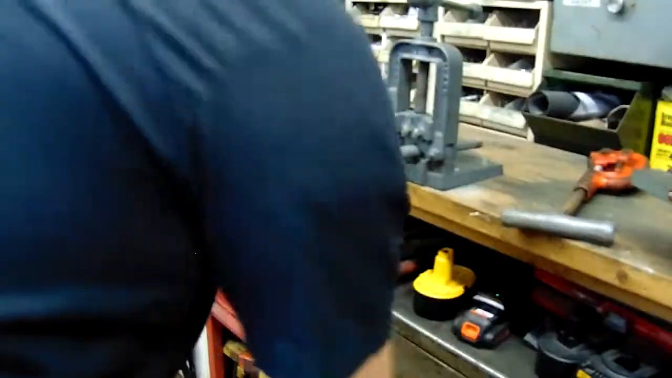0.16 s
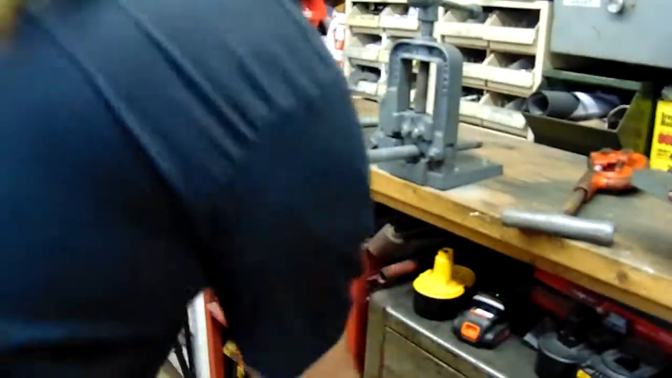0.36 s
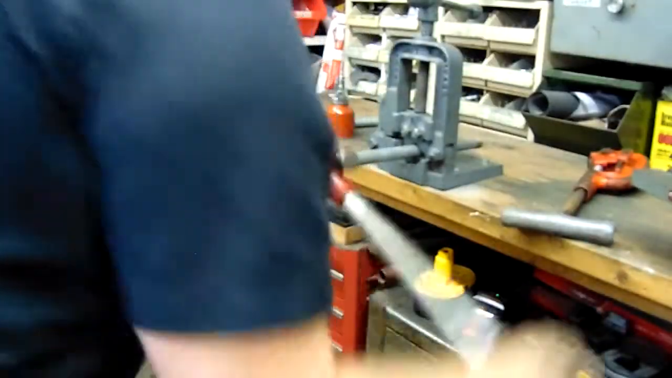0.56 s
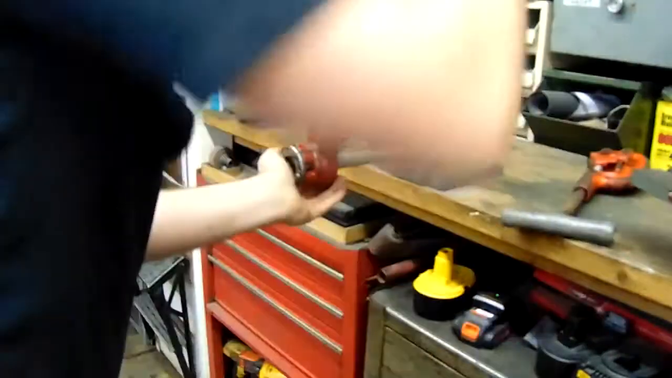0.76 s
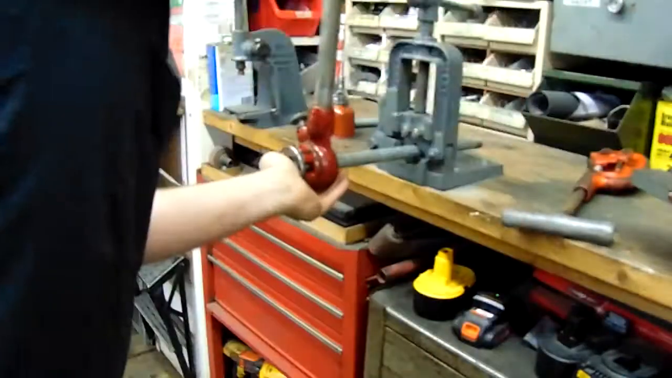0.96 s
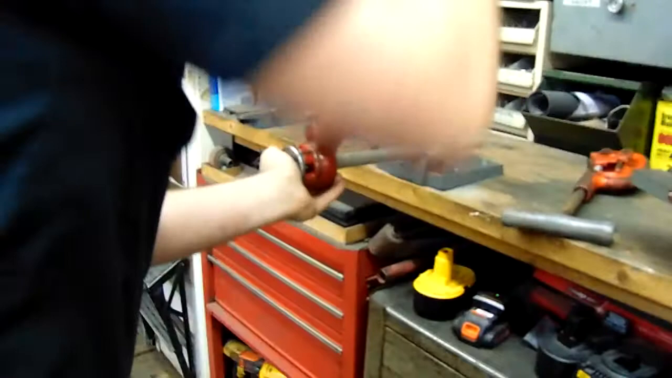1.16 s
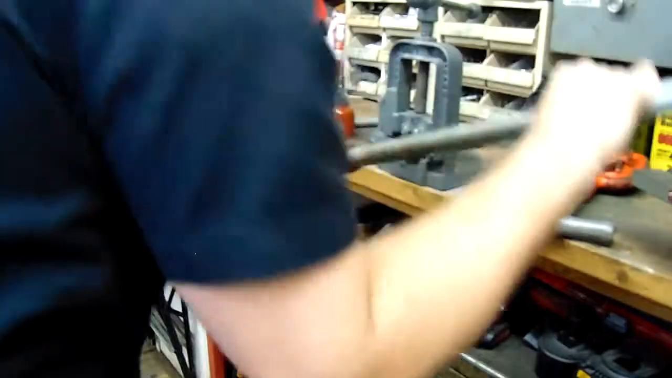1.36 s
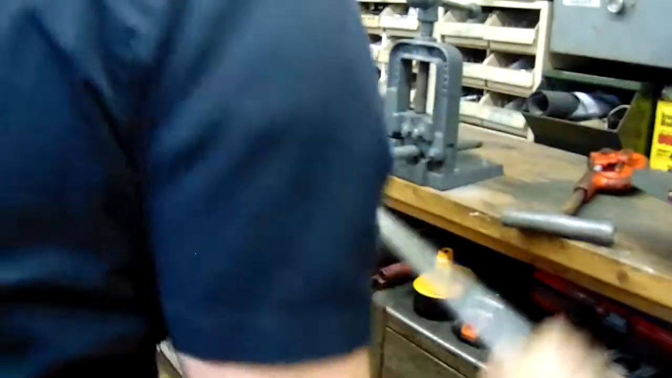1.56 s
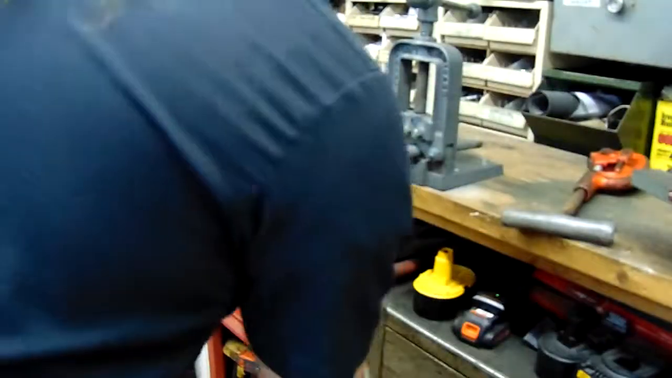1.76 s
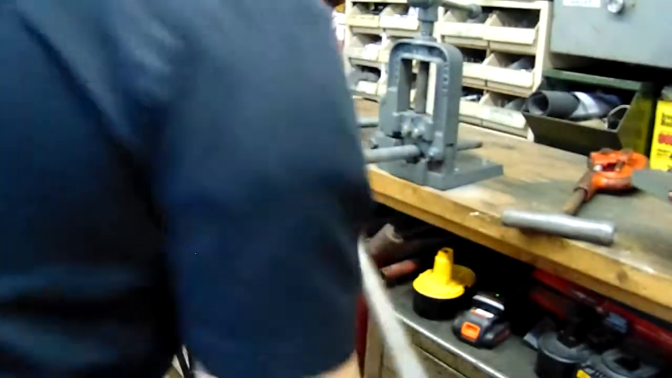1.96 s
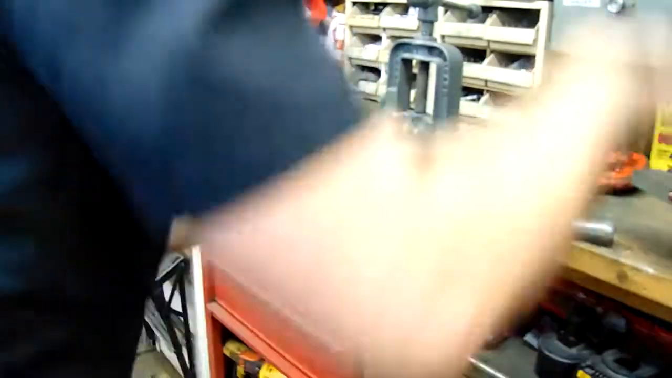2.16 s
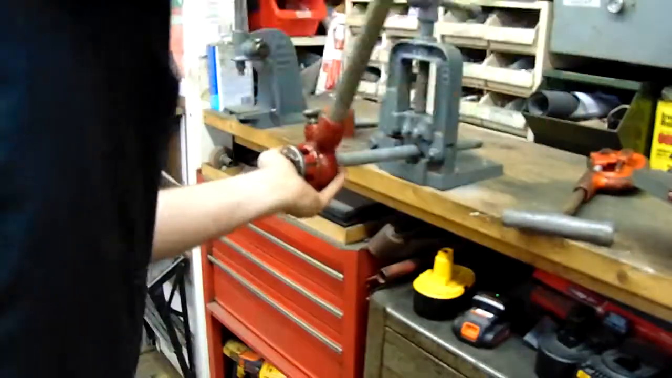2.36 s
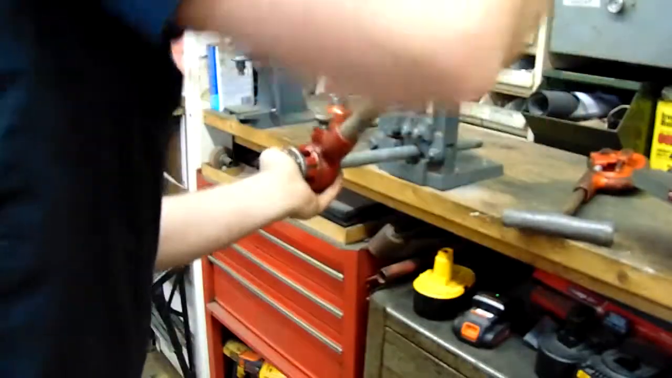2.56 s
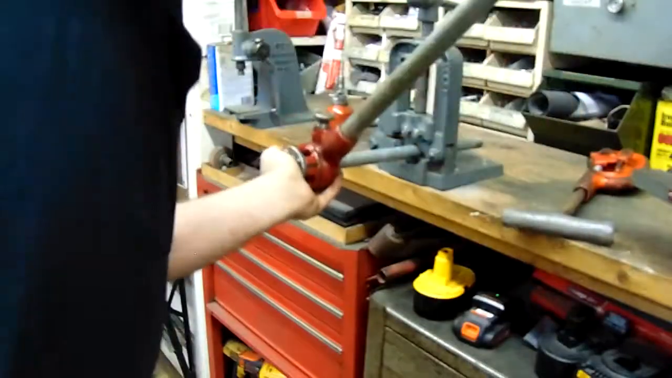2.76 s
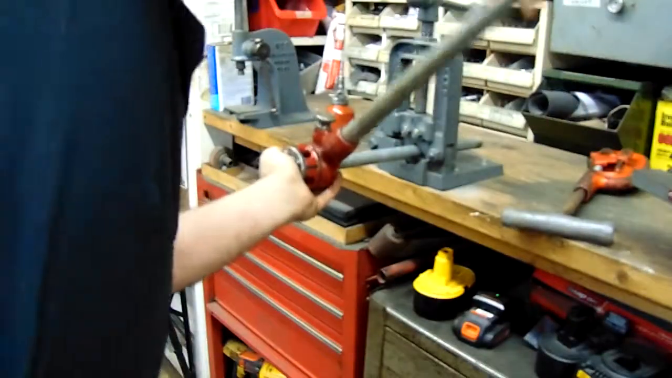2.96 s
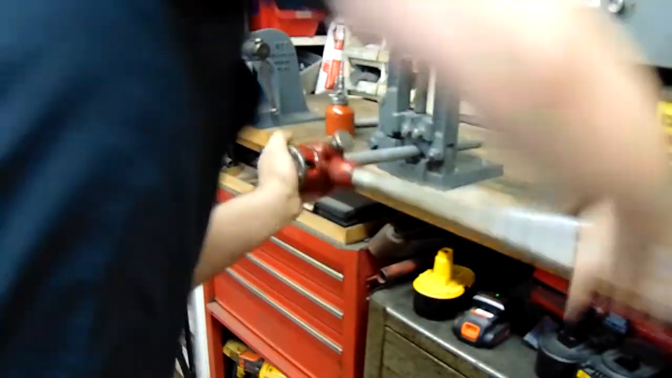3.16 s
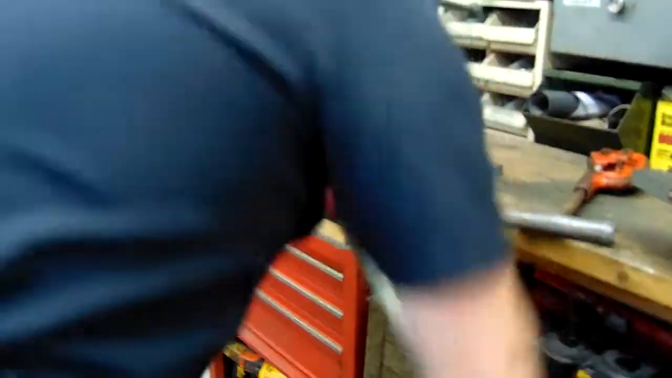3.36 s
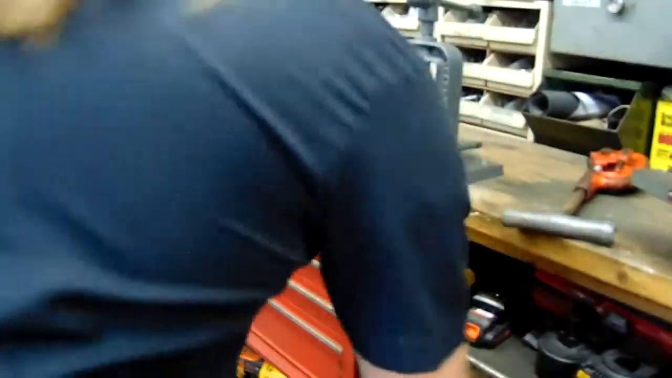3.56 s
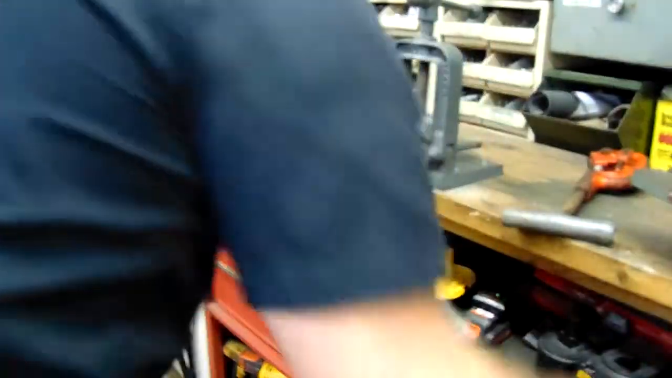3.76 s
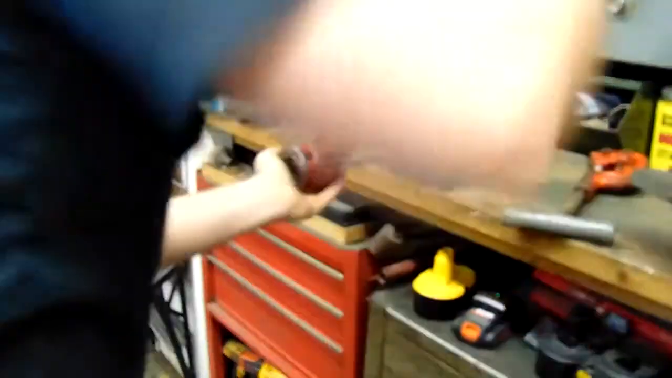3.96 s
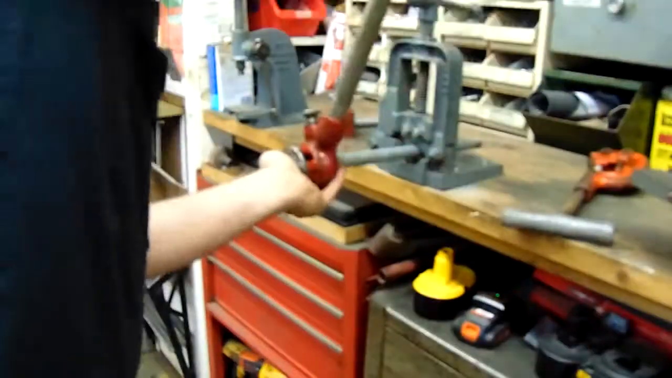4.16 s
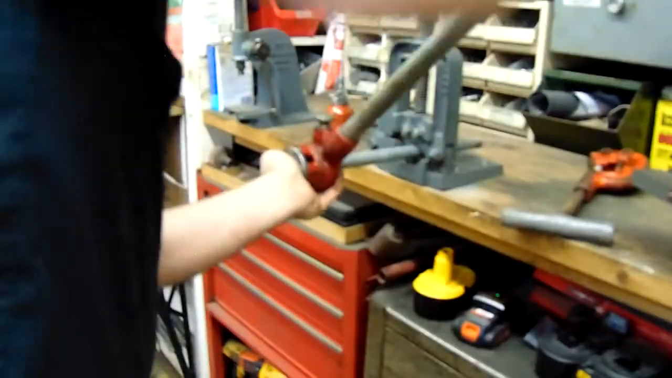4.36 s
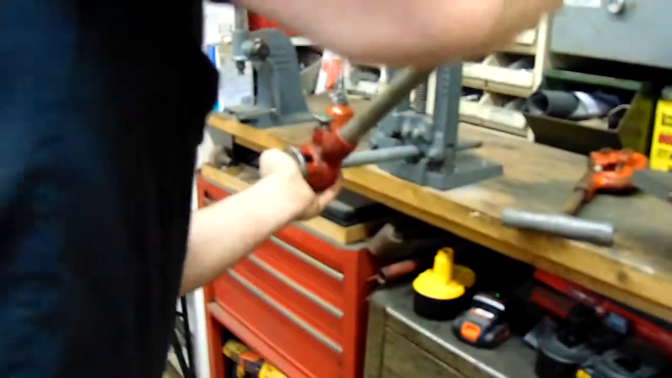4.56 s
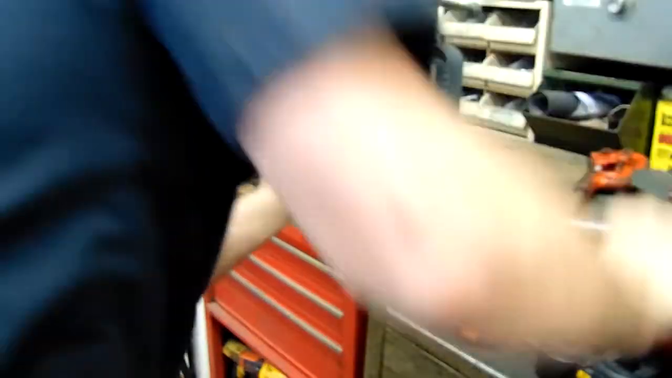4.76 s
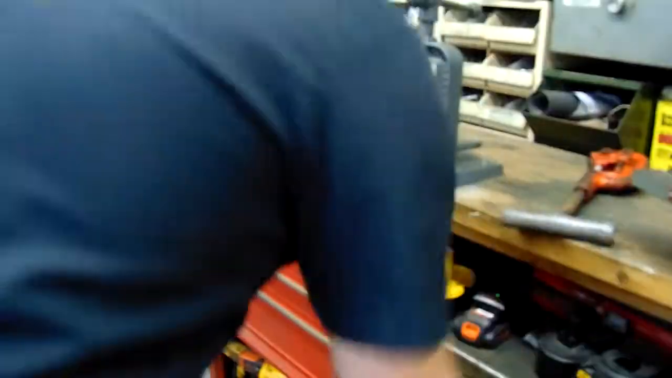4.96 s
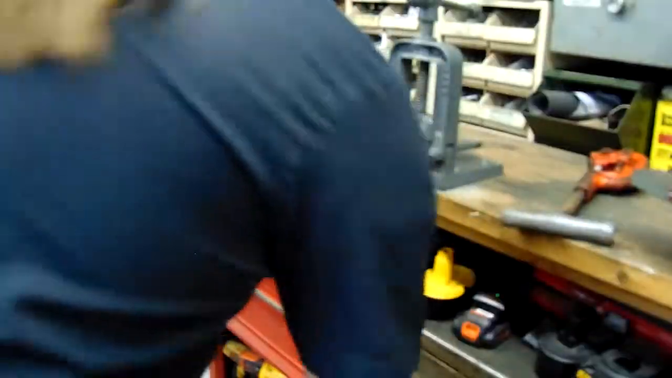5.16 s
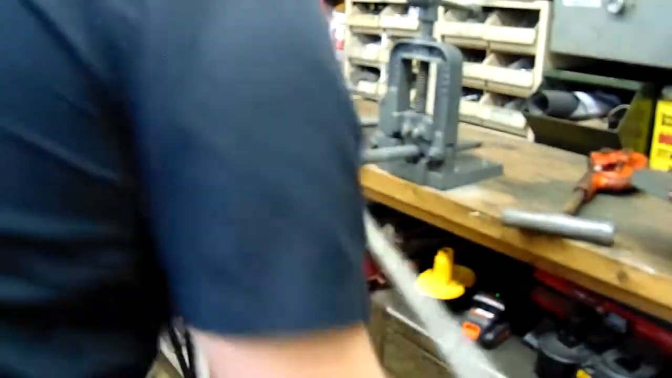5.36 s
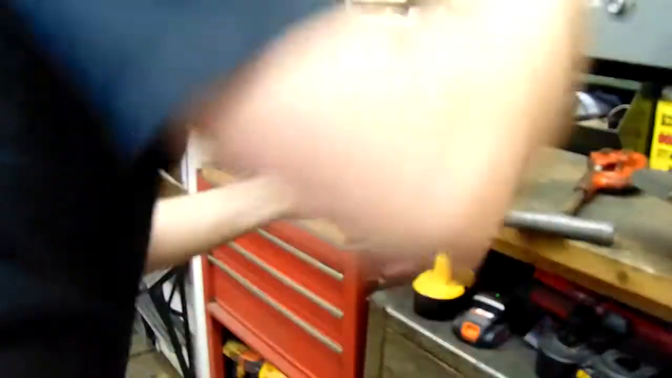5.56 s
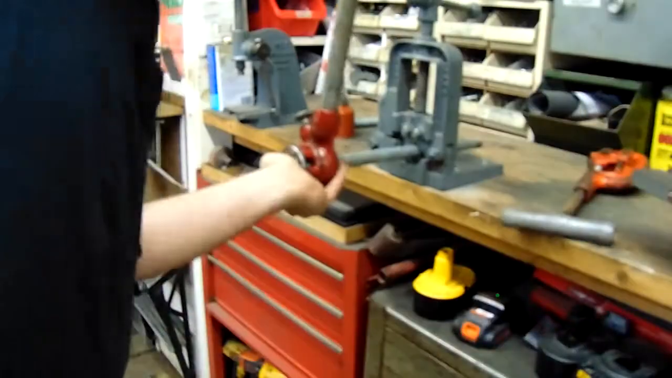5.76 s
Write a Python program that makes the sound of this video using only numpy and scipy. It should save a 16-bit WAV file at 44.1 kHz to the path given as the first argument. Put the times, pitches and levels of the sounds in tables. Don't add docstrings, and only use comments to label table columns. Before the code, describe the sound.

A ratcheting hand pipe threader clacks in short runs of bright metallic snaps, with dull bench knocks and faint steel scraping between strokes.

```python
import sys
import numpy as np
from scipy import signal
from scipy.fft import rfft, irfft
from scipy.io import wavfile
from scipy.ndimage import uniform_filter1d

SR = 44100
rng = np.random.default_rng(int(sys.argv[2]) if len(sys.argv) > 2 else 0)


def to_wav(s):
    ch = np.atleast_2d(s).T
    pcm = np.round(np.clip(ch, -1, 1) * 32767)
    wavfile.write(sys.argv[1], SR, pcm.astype(np.int16))


def gain_from_db(level_db):
    decades = np.asarray(level_db, float) / 20
    return 10 ** decades


N = 256220

# [f/Hz, level/dB, t60/s]
BENCH_MODES = [(259, 5, 0.21), (251.8, 14, 0.16), (294, -16, 0.052), (336.5, 1, 0.32), (470, 21.5, 0.11),
               (522, 20.5, 0.028), (649, 4.5, 0.23), (765.6, -2, 0.23), (849, -3.5, 0.18), (1053, 3.5, 0.1),
               (1390, -66, 0.058), (1990, -2, 0.093), (2373, 6, 0.023), (3590, -32, 0.15),
               (4460, -24, 0.12), (5030, -38, 0.18), (6800, -57, 0.45)]
# [f/Hz, density/dB per Hz]
THUD_SPECTRUM = [(88, -22), (150, -14), (304, 9), (376, 2), (501, -2), (561, 2.5), (748, -6), (6250, -43.5),
                 (6750, -39.5), (14500, -49.5)]
BENCH_SPREAD = 0.012


def colour(x, points):
    hz, db = np.transpose(points)
    grid_hz = np.maximum(np.fft.rfftfreq(4096, 1 / SR), 1)
    cepstrum = irfft(np.interp(np.log(grid_hz), np.log(hz), db) * np.log(10) / 20)
    cepstrum[1:2048] *= 2
    cepstrum[2049:] = 0
    impulse = irfft(np.exp(rfft(cepstrum)))[:2048]
    return signal.fftconvolve(x, impulse)[:len(x)]


def unit(x):
    return x / np.sqrt(np.mean(x ** 2))


def walk(rate_hz):
    k = int(SR / rate_hz)
    steps = np.repeat(rng.standard_normal(N // k + 1), k)
    return uniform_filter1d(uniform_filter1d(steps, k), k)[:N]


def fade(t, t60):
    return np.exp(-np.log(1000) * t / np.maximum(t60, .01))


def swell(rows, attack_s, t60_s):
    t = np.arange(0, N, 64) / SR
    gain = 0
    for s, hold_s, db in rows:
        rise = fade(np.maximum(s - t, 0), attack_s)
        fall = fade(np.maximum(t - s - hold_s, 0), t60_s)
        gain = gain + gain_from_db(db) * rise * fall
    return np.interp(np.arange(N) / SR, t, gain)


def at_time(s, sound):
    return np.concatenate([np.zeros(int(s * SR)), sound, np.zeros(N)])[:N]


def place(s, sound, db):
    peak = np.sqrt(uniform_filter1d(sound ** 2, 128).max())
    return at_time(s, gain_from_db(db) / peak * sound)


def ring(t, modes, spread, damping, rise_ms):
    scatter_db, blur_hz, longest_t60_s = 2.5, 14, 0.4
    wobble_db, wobble_ms = 5.5, 4.5
    hz, db, t60 = np.repeat(np.transpose(modes), 3, axis=1)[:, :, None]
    size, detune, phase = rng.standard_normal((3, len(hz), 1))
    slow_t = t[::8]
    rise = 1 - np.exp(-slow_t * np.sqrt(hz * 1000) / rise_ms)
    decay = fade(slow_t, damping * np.minimum(t60, longest_t60_s))
    step = int(wobble_ms * SR / 8000)
    touches = rng.standard_normal((len(hz), len(t) // 8 // step + 2))
    wobble = uniform_filter1d(np.repeat(touches, step, axis=1), step)[:, :len(slow_t)]
    envelope = gain_from_db(db + scatter_db * size + wobble_db * wobble) * rise * decay
    envelope = np.repeat(envelope, 8, axis=1)[:, :len(t)]
    partial_hz = hz + (spread * hz + blur_hz) * detune
    angle = (2 * np.pi * (partial_hz * t + phase)).astype(np.float32)
    return np.sum(envelope * np.sin(angle), axis=0)


def blow(s, part_db, edges_hz, chatter_ms, build, spectrum, ringing, late_ms, rattle_db, rattle_ms,
         top_ms=1000):
    t = np.arange(len(ringing)) / SR
    push = t * 1000 / max(chatter_ms, .5)
    bounces = np.repeat(rng.exponential(size=len(t) // 130 + 1), 130)[:len(t)]
    rattle = gain_from_db(rattle_db) * np.exp(-t * 1000 / rattle_ms) * bounces
    chatter = (1 - build + 3 * build * push) * np.exp(-push)
    contact = rng.standard_normal(len(t)) * (chatter + rattle)
    sound = unit(colour(contact, spectrum)) + ringing
    below = []
    for hz in edges_hz:
        lowpass = signal.butter(4, hz, fs=SR, output="sos")
        below.append(signal.sosfiltfilt(lowpass, sound))
    parts = np.diff([0 * t] + below + [sound], axis=0)
    parts[0] *= 1 - np.exp(-t * 1000 / late_ms)
    parts[-1] *= np.exp(-t * 1000 / top_ms)
    peaks = np.sqrt(uniform_filter1d(parts ** 2, 128).max(axis=1))
    return at_time(s, gain_from_db(np.array(part_db)) / peaks @ parts)


def gripped(s):
    # [start/s, modes [f/Hz, level/dB]]
    grips = [
        (0, [(479, 0), (1050, -5), (1760, -11), (2260, -6), (3670, -6), (4180, -10), (4645, -3), (4870, -2), (5200, -9), (6768, -9), (8680, -15)]),
        (1.6, [(490, -1), (1040, 0), (2450, -3), (3210, -5), (3410, -7), (3740, -7), (4640, -7), (4880, -2), (5460, -5), (6310, -9), (6765, -11)]),
        (3.2, [(474, 0), (1030, -3), (2220, -8), (3060, -6), (3600, -7), (4410, -9), (4890, -1), (5490, -6), (6290, -3), (6780, -11)]),
        (4.9, [(479, -2), (888, -1), (1630, 0), (3220, -5), (3410, -6), (3640, -5), (4620, -2), (4880, -2), (6770, -9)]),
    ]
    modes = [modes for start_s, modes in grips if start_s < s][-1]
    return [(hz, db, 0.38 * (hz / 1000) ** -0.25) for hz, db in modes]


def shop(x, wet_db):
    # [f/Hz, t60/s]
    shop_t60 = [(60, 1), (250, 0.27), (1000, 0.5), (4000, 0.38), (9000, 0.29), (14000, 0.29)]
    t = np.arange(SR) / SR
    hz, t60 = np.transpose(shop_t60)
    echo = 0
    for mid_hz in 45 * 2 ** np.arange(9):
        edges_hz = [mid_hz / np.sqrt(2), min(mid_hz * np.sqrt(2), .45 * SR)]
        band = signal.butter(2, edges_hz, "band", fs=SR, output="sos")
        octave = signal.sosfilt(band, rng.standard_normal(SR))
        echo = echo + octave * fade(t, np.interp(np.log(mid_hz), np.log(hz), t60))
    echo *= 1 - np.exp(-t / 0.002)
    return x + gain_from_db(wet_db) * signal.fftconvolve(x, echo / np.linalg.norm(echo))[:N]


def hiss():
    # [f/Hz, density/dB]
    hiss_spectrum = [(88, -38), (150, -7), (355, -1), (438, -7), (551, -5), (680, -9.5), (807, -6),
                     (3800, -18), (13700, -22.5), (14500, -18)]
    return unit(colour(rng.standard_normal(N), hiss_spectrum)) * gain_from_db(-56.5 + 0.4 * walk(4.4))


def shaking():
    # [f/Hz, level/dB]
    rumble_spectrum = [(12, -38), (20, 8), (70, 9), (128, 4), (156, -8.5), (183, -47), (200, -10),
                       (260, -4), (440, -120)]
    # [t/s, hold/s, level/dB]
    shakes = [(.15, 0.026, -53), (.55, .02, -48), (.69, 0.044, -45), (.9, 0.13, -47), (1.23, .02, -39),
              (1.3, 0.076, -37.5), (1.87, 0.017, -50), (2.02, .02, -50), (2.3, 0.19, -45.5),
              (2.69, 0.056, -29), (3.74, .03, -42), (3.98, 0.09, -42), (4.21, 0.013, -44),
              (4.5, 0.034, -28.5), (4.95, 0.18, -54), (5.34, .03, -41), (5.6, 0.22, -46)]
    tone = gain_from_db(np.interp(np.fft.rfftfreq(N, 1 / SR), *np.transpose(rumble_spectrum), right=-80))
    rumble = unit(irfft(rfft(rng.standard_normal(N)) * tone, N))
    still = gain_from_db(-53.5 + 1.4 * walk(15.0))
    return rumble * (swell(shakes, attack_s=0.15, t60_s=0.62) + still) * gain_from_db(-7.5)


def panels():
    # [t/s, f/Hz, level/dB, t60/s]
    panel_tones = [
        (1.29, 555, -47, 2.6),
        (1.288, 255, -21, .13),
        (1.3, 305, -20, .19),
        (2.0, 262, -29, .2),
        (2.69, 555, -53, 2.6),
        (2.69, 250, -36, .45),
        (2.978, 965, -47, .08),
        (3.735, 300, -29, .17),
        (4.49, 237, -40, 1.1),
        (5.325, 290, -29, .17),
    ]
    rise_s = 0.0027
    s, hz, db, t60 = np.transpose(panel_tones)[:, :, None]
    since = np.maximum(np.arange(N) / SR - s, 0)
    envelope = gain_from_db(db) * (1 - np.exp(-since / rise_s)) * fade(since, t60)
    return np.sum(envelope * np.sin(2 * np.pi * hz * since), axis=0)


def sleeve():
    # [t/s, hold/s, level/dB]
    rustles = [
        (.11, 0.034, -55.5),
        (2.83, 0.024, -50),
        (2.9, .04, -58),
        (3.19, .01, -61),
        (5.0, .13, -62),
    ]
    fibres = rng.standard_normal(N) * gain_from_db(2 * rng.exponential(size=N))
    cloth = unit(colour(fibres, [(3000, -29.0), (8000, -1.0), (12500, 8)]))
    return cloth * swell(rustles, attack_s=0.17, t60_s=0.1)


def dies():
    # [f/Hz, density/dB per Hz]
    scrape_spectrum = [(120, -40), (200, -18), (352, -0.5), (433, -30), (467, -2.5), (741, -7.5), (810, -8),
                       (1010, -5.5), (1610, -13.5), (2290, -15), (4500, -12.5), (4900, -21), (9100, -51),
                       (15400, -120)]
    # [f/Hz, width/Hz, level/dB]
    die_body = [(525, 180, -25), (1064, 150, -13), (1400, 200, -17), (1750, 150, -20), (2200, 300, -22),
                (2700, 120, -20), (3300, 130, -16), (3750, 130, -18), (4350, 130, -17)]
    # [start/s, hold/s, level/dB]
    cuts = [
        (0.0, 0.32, -49.5),
        (1.66, 0.15, -43.5),
        (3.22, 0.39, -48.5),
        (4.76, 0.073, -49.5),
        (4.95, .22, -45),
    ]
    grains = rng.standard_normal(N) * gain_from_db(1.8 * rng.exponential(size=N))
    body = colour(grains, scrape_spectrum)
    for hz, width_hz, db in die_body:
        resonance = unit(signal.lfilter(*signal.iirpeak(hz, hz / width_hz, SR), grains))
        body = body + gain_from_db(db) * np.std(body) * resonance
    return unit(body) * swell(cuts, attack_s=0.33, t60_s=0.35) * gain_from_db(-5.0 + 2.5 * walk(24.6))


def jolts():
    # [t/s, level/dB]
    bench_jolts = [(0.658, -30), (0.751, -27.5), (0.848, -45), (0.969, -54), (2.182, -59), (2.29, -28),
                   (2.422, -44), (3.923, -39), (4.04, -31), (4.167, -30), (5.523, -40), (5.633, -30),
                   (5.743, -32.5)]
    out, t = 0, np.arange(SR // 4) / SR
    for s, db in bench_jolts:
        wood = unit(ring(t, BENCH_MODES[:4], BENCH_SPREAD, damping=1.0, rise_ms=5.6))
        out = out + blow(s, [db - 4.5, -150], [400], 7.5, 0.29, THUD_SPECTRUM, wood,
                         late_ms=11, rattle_db=19, rattle_ms=48)
    return out


def slack():
    # [t/s, vise/dB, bench/dB, steel/dB, top edge/dB]
    high_knocks = [(1.165, -47, -42.5, -66, -81), (1.193, -37.5, -35, -43, -43.5),
                   (1.218, -29.5, -32.5, -31.5, -54), (1.247, -29, -37, -32, -33.5),
                   (1.287, -21.5, -20.5, -22.5, -26), (1.329, -37, -54, -53, -58),
                   (1.422, -38, -33, -80, -59), (1.492, -65, -62, -58, -74), (2.651, -41, -43, -38.5, -55),
                   (2.673, -28, -33, -33.5, -37), (2.695, -29.5, -30.5, -36, -94),
                   (4.415, -34.5, -39.5, -30.5, -31.5), (4.474, -25.5, -51, -31.5, -39),
                   (4.484, -27.5, -30.5, -47, -62), (4.509, -44, -35, -59, -68),
                   (4.559, -39, -32.5, -46, -55)]
    # [t/s, vise/dB, bench/dB, steel/dB, top edge/dB]
    low_knocks = [(1.839, -28.5, -30, -55, -61), (1.958, -62, -36, -71, -73), (1.985, -59, -46, -44.5, -58),
                  (1.996, -29, -29.5, -40, -55), (2.034, -50.5, -55, -40.5, -43.5),
                  (3.69, -39.5, -34, -76, -58), (3.721, -25, -26, -25.5, -47), (3.758, -38, -45, -50, -47),
                  (5.26, -37.5, -31, -73, -60), (5.318, -27, -26.5, -29, -55),
                  (5.378, -36.5, -64, -43, -65)]
    edges_hz = [800, 2800, 5800]
    out, t = 0, np.arange(SR // 4) / SR
    for s, vise_db, bench_db, steel_db, top_db in high_knocks + low_knocks:
        chatter_ms = 3.4 + 0.7 * (vise_db - top_db)
        wood = gain_from_db(-0.5) * unit(ring(t, BENCH_MODES, BENCH_SPREAD, damping=1.0, rise_ms=3.8))
        out = out + blow(s, [bench_db, vise_db, steel_db, top_db], edges_hz, chatter_ms, 0.12,
                         THUD_SPECTRUM, wood, late_ms=4.8, rattle_db=-10.0, rattle_ms=56.5, top_ms=54)
        slim = [mode for mode in gripped(s) if mode[0] > edges_hz[1]]
        steel = ring(t, slim, 0.0065, damping=0.83, rise_ms=4.5)
        out = out + place(s, steel, steel_db - 10)
        body = ring(t, BENCH_MODES[:4], BENCH_SPREAD, damping=0.78, rise_ms=9.7)
        out = out + place(s, body, bench_db - 3)
    return out


def pawl():
    # [t/s, steel/dB, handle bending/dB, chatter/ms, leading mode/Hz]
    snaps = [(0.4837, -37, 1, 2.7, 2340), (0.5261, -41, 2.5, 2.8, 920), (0.587, -47, -3, 10, 3225),
             (0.6564, -21, -6, 19, 2416), (0.749, -17.5, -11, 8.6, 2270), (0.847, -21, -7.5, 13, 2190),
             (0.9715, -19, -9, 3.5, 2077), (2.1824, -20.5, -12, 22.7, 4920), (2.2948, -16, -3.5, 3.2, 2540),
             (2.4242, -21, -14, 6.5, 2450), (3.9263, -19.5, -18.5, 15.4, 3120),
             (4.0398, -16.5, -11.5, 5.7, 3260), (4.1679, -19, -8.5, 8.1, 3350),
             (5.5246, -18, -5, 8.5, 1572), (5.634, -17.5, -7, 15.3, 1557), (5.7442, -15.5, -8.5, 5.9, 3510)]
    # [f/Hz, level/dB, t60/s]
    steel_modes = [(474, -10, 0.26), (915, -13, 0.28), (1061, 0, 0.052), (1620, -15, 0.23),
                   (1728, -19, 0.26), (2261, -17, 0.34), (2460, -14, 0.22), (3230, -10, 0.12),
                   (3413, -21, 0.37), (3650, -16, 0.28), (4662, -13, 0.22), (4877, -13, 0.29),
                   (5496, -18, 0.31), (6250, -14, 0.18), (6761, -11, 0.19), (7634, -27, 0.32),
                   (8387, -22, 0.23), (8608, -19, 0.17), (11240, -18, 0.15), (12470, -23, 0.21),
                   (13010, -19, 0.11), (13590, -26, 0.17)]
    # [f/Hz, density/dB per Hz]
    crack_spectrum = [(120, -33), (200, -21.5), (809, -4), (1080, -2), (1660, -1.5), (2370, 4), (2690, 5.5),
                      (4950, 3.5), (9100, -27.5), (12600, -24.5), (14500, -35)]
    edges_hz = [1250, 7400]
    out, t = 0, np.arange(SR // 3) / SR
    thin = signal.butter(1, 1300, "high", fs=SR, output="sos")
    for s, db, low_db, chatter_ms, lead_hz in snaps:
        top_db = -0.5 + 0.96 * min(db + 21, 0)
        build = 2.08 / chatter_ms
        steel = gain_from_db(-16.0) * unit(ring(t, steel_modes, 0.006, damping=0.37, rise_ms=0.98))
        out = out + blow(s, [db + low_db, db, db + top_db], edges_hz, chatter_ms, np.clip(build, 0, 1),
                         crack_spectrum, steel, late_ms=58.0, rattle_db=-12, rattle_ms=12)
        lead_db = 4.5 + 6 * min(build, 1)
        lead = gripped(s) + [(lead_hz, lead_db, 0.15)]
        leading = ring(t, lead, 0.0065, damping=0.76, rise_ms=0.8)
        out = out + place(s, signal.sosfilt(thin, leading), db - 2.5)
        out = out + blow(s - .006, [db - 21.5, db - 20.5, db - 34], edges_hz, 1.6, 1.0, crack_spectrum,
                         np.zeros(2000), late_ms=1.1, rattle_db=-33, rattle_ms=4.6)
    return out


def scene():
    background = hiss() + shaking() + panels()
    knocks = shop(slack() + jolts(), wet_db=-10.5)
    snapping = shop(pawl(), wet_db=-9.5)
    return (background + sleeve() + dies() + knocks + snapping)[None]


def roll_off(x):
    return signal.sosfilt(signal.butter(12, 15440, fs=SR, output="sos"), x)


def record(dry):
    lowpass = signal.ellip(9, .2, 60, 14250, fs=SR, output="sos")
    mix = signal.sosfilt(lowpass, dry)
    return roll_off(mix)


dry = scene()
out = record(dry)
to_wav(out)
```